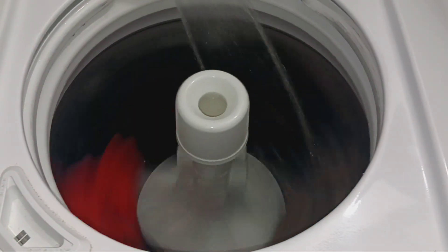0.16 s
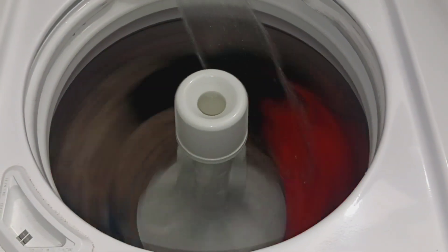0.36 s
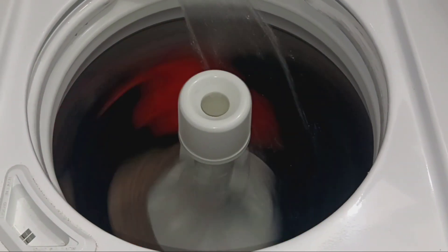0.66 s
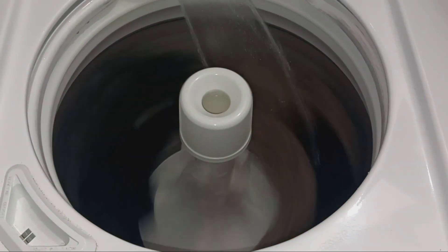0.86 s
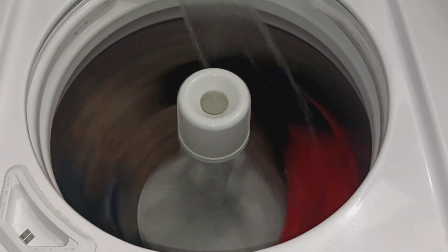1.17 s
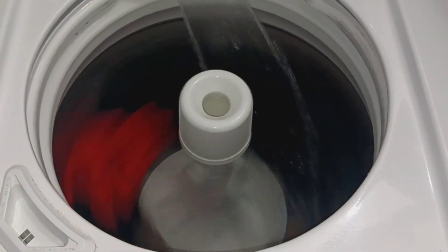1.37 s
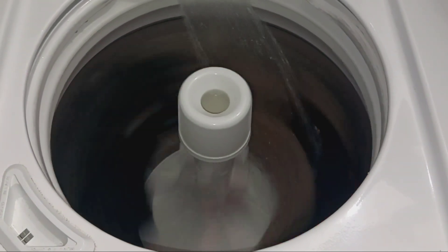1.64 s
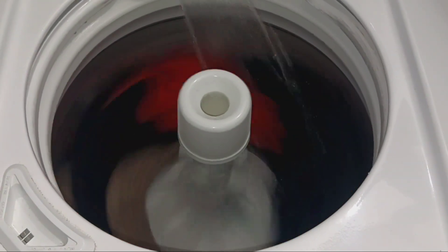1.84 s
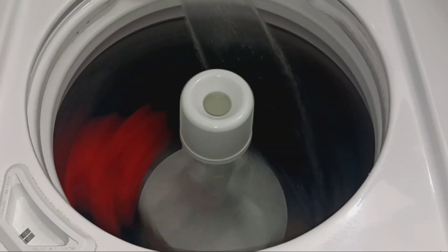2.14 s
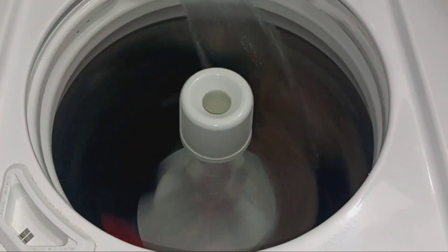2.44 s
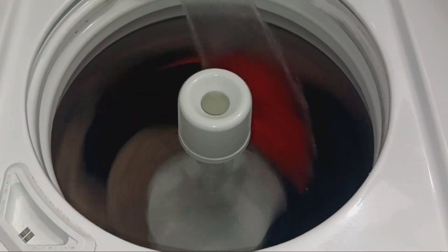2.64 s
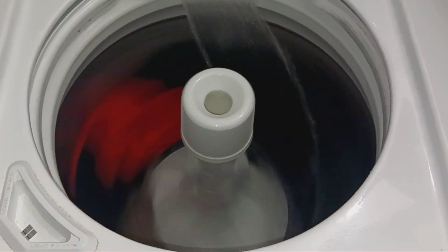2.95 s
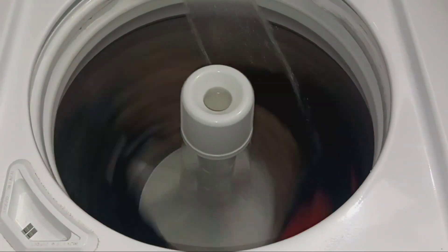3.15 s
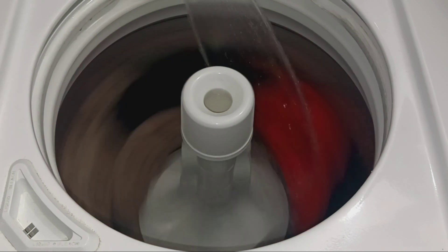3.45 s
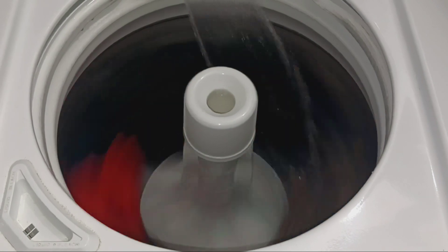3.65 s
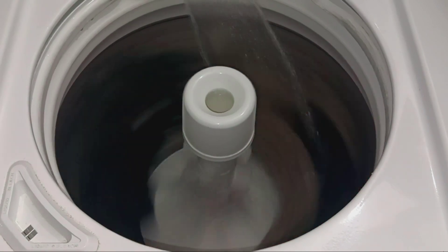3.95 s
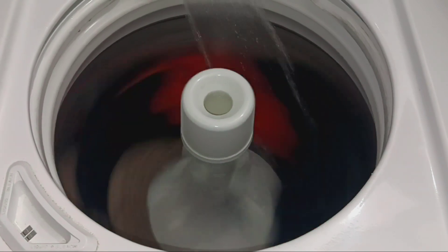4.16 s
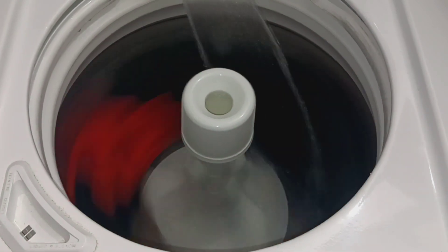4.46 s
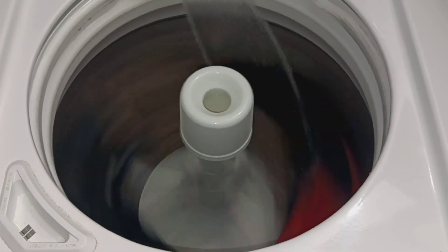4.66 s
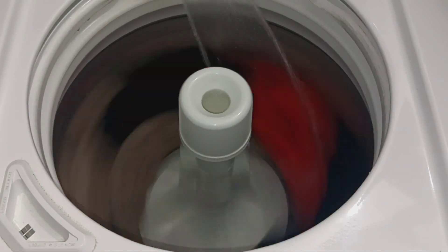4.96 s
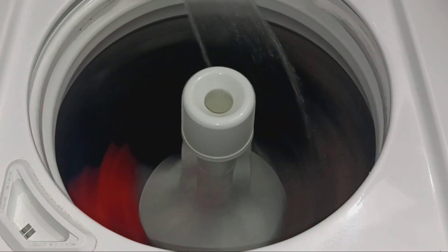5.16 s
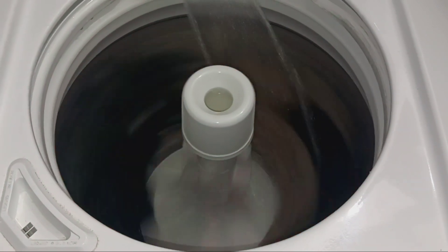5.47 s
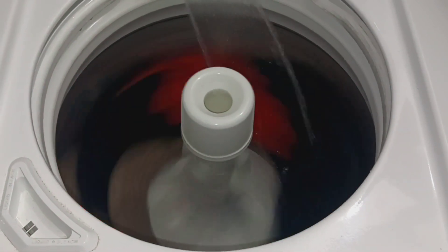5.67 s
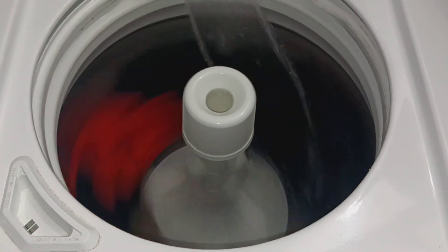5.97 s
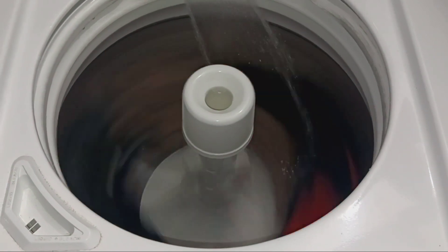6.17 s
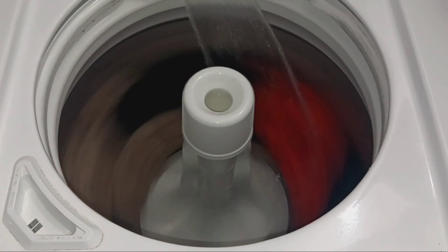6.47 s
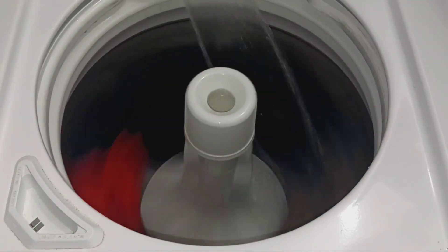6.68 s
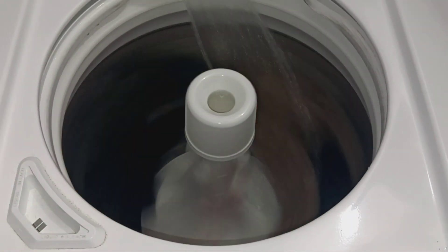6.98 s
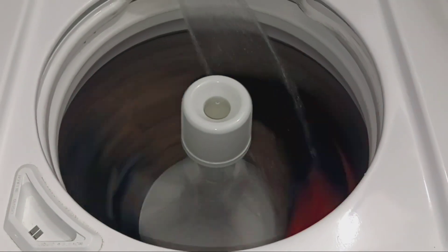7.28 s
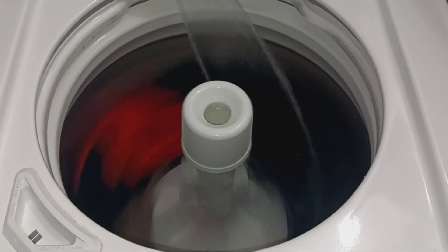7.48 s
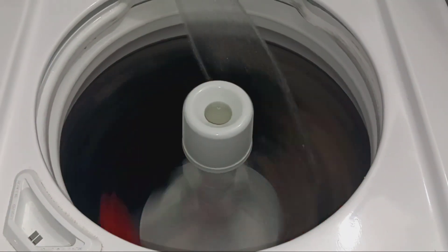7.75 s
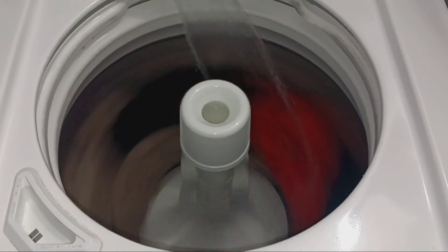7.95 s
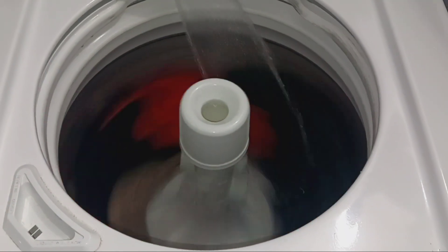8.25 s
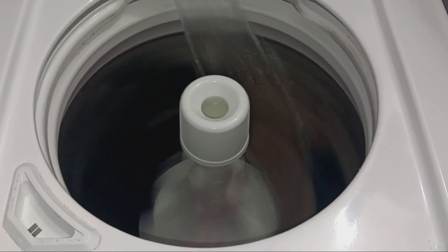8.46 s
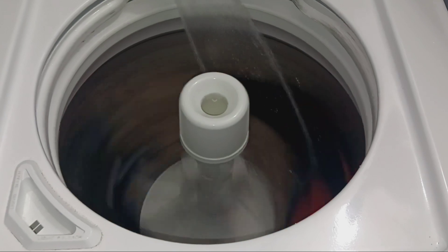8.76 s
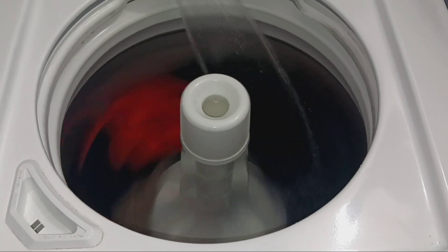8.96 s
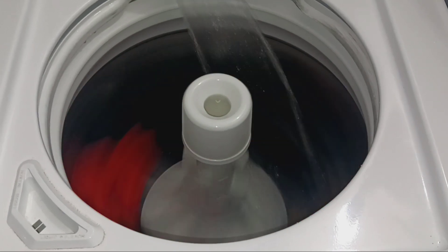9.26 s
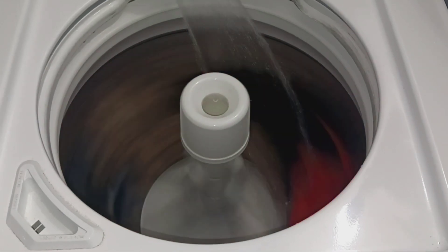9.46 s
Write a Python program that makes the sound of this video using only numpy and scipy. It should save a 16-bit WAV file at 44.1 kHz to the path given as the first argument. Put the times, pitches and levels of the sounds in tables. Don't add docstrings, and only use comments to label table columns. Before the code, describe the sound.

Inside an open top-loading washer, a deep motor hum and cabinet rumble run without pause, throbbing about two and a half times a second. A fine spray hisses over passing laundry with short irregular spatters, tiny ticks and faint hollow water slaps. The throb quickens slightly. Close handheld phone in a laundry room; left side dull and boomy, right side brighter.

```python
import sys
import numpy as np
from scipy import signal
from scipy.fft import rfft, irfft, next_fast_len
from scipy.io import wavfile
from scipy.ndimage import uniform_filter1d

SR = 44100
rng = np.random.default_rng(int(sys.argv[2]) if len(sys.argv) > 2 else 0)


def gain_from_db(level_db):
    decades = np.asarray(level_db, float) / 20
    return 10 ** decades


def waveform_to_disk(signal):
    frames = np.transpose(np.atleast_2d(signal))
    scaled = np.clip(frames, -1, 1) * 32767
    samples = np.round(scaled).astype(np.int16)
    wavfile.write(sys.argv[1], SR, samples)


N = 424241

# (time [s], rate [swings/s])
BASKET = [
    (0, 2.481),
    (2.4, 2.581),
    (4.8, 2.643),
    (7.2, 2.692),
    (9.62, 2.781),
]
# (time [s], phone gain [dB], cabinet boom [dB])
DRIFT = [(0, 2.5, -2), (.25, 1.5, -3.5), (.6, 2.5, -3.5), (.95, 0.5, -0.5), (1.3, -0.34, .2), (2.2, 0, 0),
         (3.2, 0.24, 0), (4.9, 0.16, 0), (5.4, 0, 0.5), (5.68, -2, 0.3), (5.85, -.4, 0.7), (6.05, -.4, -.6),
         (6.3, 0, 0), (8, -0.24, 0), (9.62, -0.4, 0.6)]
# (time [s], peak [dB], ring [Hz])
GURGLES = [(0.066, -33, 694), (0.311, -33, 705), (0.517, -31, 711), (0.645, -31, 719), (0.917, -22, 711),
           (1.119, -38, 743), (1.837, -30, 724), (2.049, -33, 762), (2.3, -27, 720), (2.603, -31, 770),
           (2.823, -29, 719), (3.377, -27, 719), (3.88, -31, 721), (4.055, -31, 719), (4.729, -26, 720),
           (5.236, -28, 780), (5.758, -32, 762), (5.931, -29, 705), (6.279, -28, 708), (6.7, -30, 705),
           (7.621, -31, 799), (7.922, -31, 721), (8.397, -31, 781), (8.801, -36, 778)]
# (time [s], peak [dB], centre [Hz], width [octaves])
SPLASHES = [(0.1027, -15, 10000, .9), (0.134, -10.5, 7000, 1.1), (0.4988, -26, 9330, .6),
            (1.0839, -25, 6860, .6), (1.3154, -17, 5560, .12), (1.4653, -12.5, 6210, .3),
            (1.4984, -11, 3900, 1.1), (1.8008, -18, 10500, 1.1), (2.1929, -18, 4200, .3),
            (2.2418, -18, 6400, .4), (2.639, -14, 5900, .6), (3.2779, -13, 9800, .6),
            (3.69, -11.5, 5460, 0.85), (3.8686, -13, 10000, .6), (4.1929, -18, 6610, .6),
            (4.3904, -17, 6100, .6), (5.3278, -14, 9880, .6), (5.7064, -18, 6830, .6),
            (6.1804, -17, 6690, .6), (6.6144, -20, 6090, .6), (6.7755, -19, 5210, .6),
            (6.9915, -21, 7100, .6), (7.455, -9, 4040, .7), (7.5727, -18, 6910, .4),
            (7.9349, -17, 5740, .35), (8.2242, -12, 12800, .45), (8.525, -9, 9000, .8),
            (8.6462, -20, 6380, .3), (9.1597, -11.5, 5150, 0.81), (9.3906, -14, 9600, .6)]


def evened(x):
    return x / np.sqrt(np.mean(x ** 2) + 1e-20)


def read(points, hz, below_db=0, above_db=0):
    f, value = np.transpose(points)
    octave = np.log2(np.maximum(hz, 1))
    low_slope = below_db * np.maximum(np.log2(f[0]) - octave, 0)
    high_slope = above_db * np.maximum(octave - np.log2(f[-1]), 0)
    return np.interp(octave, np.log2(f), value) + low_slope + high_slope


def curve(table, t, count):
    rows = np.array(table)
    return np.interp(t, rows[:, 0], rows[:, count])


def swings(t):
    return np.cumsum(curve(BASKET, t, count=1)) * t[1]


def throb(row, t):
    turns, speed = swings(t), curve(BASKET, t, count=1)
    wave = 0
    for k, (depth_db, start) in enumerate(np.reshape(row[1:], (-1, 2)), 1):
        wave = wave + depth_db * np.cos(2 * np.pi * (k * turns + start))
    return row[0] + wave * (speed / speed.mean()) ** 4.9


def wander(t, low_hz, high_hz):
    slow = np.arange(0, t[-1] + .02, .01)
    x = np.zeros(len(slow))
    for f in np.geomspace(low_hz, high_hz, 40):
        x += np.sin(2 * np.pi * (f * slow + rng.random())) / np.sqrt(f)
    return np.interp(t, slow, evened(x))


def tone(level_db, angle):
    return gain_from_db(level_db) * np.sqrt(2) * np.cos(angle)


def motor():
    # (left [dB], right [dB], start [turns], rocking depth [rad], rocking start [rad])
    harmonics = [
        (2.9, -3, 0, .18, .11),
        (4.2, -.8, .26, .33, -2.01),
        (5.9, 1, -.34, .06, -.64),
    ]
    # (mean [dB], then depth [dB], start [turns] for once, twice, thrice a swing)
    hum_throb = [(-8.6, 0.97, -0.061, 0.59, 0.065, 0.28, -.42), (-31.5, 2.74, 0.3, 1, 0.21, .1, -.24),
                 (-29, 1.8, 0.18, 0.42, -0.42, 0.16, -0.4)]
    # (hum multiple, shaft order, left [dB], right [dB])
    whine = [(0, 16, -31.5, -36.7), (0, 17, -45, -54), (0, 57, -39.5, -62), (1, 1, -42, -47),
             (3, -1, -39, -50), (3, 1, -35, -46)]
    # (rate [Hz], left [dB], right [dB])
    shake = (19.96, -35.5, -40.5)
    hum_hz, shaft_hz = 120.012, 19.372
    t, out = np.arange(N) / SR, np.zeros((2, N))
    turns = swings(t)
    for k, (left_db, right_db, start, depth, rock) in enumerate(harmonics, 1):
        angle = 2 * np.pi * (k * hum_hz * t + start) + depth * np.cos(2 * np.pi * turns + rock)
        level_db = throb(hum_throb[k - 1], t) + k * 0.35 * wander(t, 1.5, 8)
        if k == 1:
            level_db += curve(DRIFT, t, count=2)
        out += gain_from_db([[left_db], [right_db]]) * tone(level_db, angle)
    for hum, order, left_db, right_db in whine:
        hz = hum * hum_hz + order * shaft_hz
        drag = 0.016 * order * np.cos(np.pi * turns)
        flutter_db = 0.62 * wander(t, 1.5, 8)
        angle = 2 * np.pi * (hz * t + rng.random()) + drag
        out += gain_from_db([[left_db], [right_db]]) * tone(flutter_db, angle)
    hz, left_db, right_db = shake
    throb_db = 1.3 * np.cos(2 * np.pi * (turns + 0.87))
    return out + gain_from_db([[left_db], [right_db]]) * tone(throb_db, 2 * np.pi * hz * t)


def noise_pair(size, colour_db, patchy_db):
    # (frequency [Hz], likeness [0-1])
    likeness = [(40, .7), (100, .55), (200, .85), (430, .95), (560, .5), (780, .5), (1100, .3), (1500, .35),
                (3000, .15), (8000, .05)]
    # (frequency [Hz], lead [rad])
    lead = [(350, 0), (430, .55), (520, -.3), (750, .85), (1100, -.6), (1500, 0)]
    hop = size // 4
    frames, hz = N // hop + 5, np.fft.rfftfreq(size, 1 / SR)
    a, b, c, d, patches = rng.standard_normal((frames, len(hz), 5)).T
    patches = uniform_filter1d(patches, size=8, axis=0)
    patches = evened(uniform_filter1d(patches, size=12, axis=1))
    same = np.clip(read(likeness, hz), -1, 1)[:, None]
    left, other = a + 1j * b, c + 1j * d
    right = same * left * np.exp(1j * read(lead, hz))[:, None] + np.sqrt(1 - same ** 2) * other
    z = np.array([left, right])
    z *= gain_from_db(colour_db(hz, np.arange(frames) * hop / SR) + patchy_db * patches)
    return signal.istft(z, nperseg=size, noverlap=size - hop)[1][:, :N]


def bumps(rows, t, rise_s, fade_s):
    s, peak_db = np.transpose(rows)[:2, :, None]
    height = gain_from_db(.5 * (peak_db - peak_db.max()))
    return height * np.exp(np.minimum((t - s) / rise_s, (s - t) / fade_s))


def rumble():
    # (frequency [Hz], density [dB per Hz])
    rumble_left = [(35, -15), (60, -8.5), (100, -3.5), (160, 0), (280, 0), (430, -1), (540, -7), (860, -9),
                   (1100, -7.5), (1600, -6), (1850, -8.5), (2350, -9.5), (2900, -18)]
    rumble_right = [(35, -17), (60, -13.5), (100, -6), (160, -4), (280, -7), (430, -6), (620, -14),
                    (1000, -15), (1500, -12), (1800, -18), (2300, -17.5), (2900, -20)]
    # (centre [Hz], width [Hz], left [dB], right [dB])
    panels = [(51, 10, 5, 4), (158, 12, 4, 4), (204, 12, 3, 4), (222, 12, -5, -4), (265, 14, -5, -5),
              (428, 30, 10, 9), (600, 16, 6, 4), (720, 26, 10, 1), (772, 24, 8, 7), (948, 14, 6, 2),
              (1040, 40, 4, 3), (1238, 16, 5, 1), (1204, 14, 1, 6), (1272, 14, 3.5, 1), (1444, 14, 5, 4),
              (1535, 60, 5, 2), (1713, 30, 6, 1), (2175, 60, 4.5, 4)]
    # (mean [dB], then depth [dB], start [turns] for once, twice, thrice a swing)
    slosh_throb = (-34.5, .65, -0.57, 0.49, -0.6, 0.27, 5)
    wall_throb = (-0.48, 0.77, .37, 0.036, .06, -0.069, -.3)

    def colour_db(hz, t):
        db = np.array([read(p, hz, below_db=-3, above_db=-16) for p in (rumble_left, rumble_right)])
        for centre_hz, width, left_db, right_db in panels:
            db += np.outer([left_db, right_db], 1 / (1 + (2 * (hz - centre_hz) / width) ** 2))
        wall = np.exp(-((hz - 740) / 110) ** 2)[:, None]
        slaps_db = 2.5 * bumps(GURGLES, t - .03, rise_s=0.039, fade_s=0.056).sum(0)
        gurgle_db = throb(wall_throb, t) + slaps_db - slaps_db.mean() + 1.5 * wander(t, 3, 15)
        return db[:, :, None] + wall * gurgle_db

    t = np.arange(N) / SR
    level_db = throb(slosh_throb, t) + 0.5 * wander(t, 2.5, 18)
    return gain_from_db(level_db + 9.2) * evened(noise_pair(size=4096, colour_db=colour_db, patchy_db=1.1))


def bloops():
    rise_s, fade_s = .015, 0.03
    out, t = np.zeros(N + SR), np.arange(SR // 5) / SR
    shape = np.minimum(t / rise_s, 1) * np.exp(-np.maximum(t - rise_s, 0) / fade_s)
    for s, peak_db, hz in GURGLES:
        out[round(s * SR):][:len(t)] += gain_from_db(peak_db + 1.3) * shape * np.sin(2 * np.pi * hz * t)
    return gain_from_db([[2.5], [-4.5]]) * out[:N]


def ports(x):
    # (frequency [Hz], density [dB per Hz])
    spray_left = [(2900, -21), (4200, -17), (5200, -20), (7000, -16), (8300, -23.5), (10500, -35)]
    spray_right = [(2200, -25), (3600, -20.5), (4200, -15.5), (6500, -12.5), (7800, -15.3), (9200, -11.3),
                   (11000, -15), (12800, -18.5), (15600, -20)]
    size = next_fast_len(N)
    hz = np.fft.rfftfreq(size, 1 / SR)
    gain = gain_from_db([read(p, hz, below_db=-14) + 14 for p in (spray_left, spray_right)])
    return irfft(rfft(x, size) * gain, size)[:, :N]


def spurts(t, per_s, fade_s):
    step = t[1]
    kicks = np.minimum(rng.exponential(1, len(t)), 2.5) * (rng.random(len(t)) < per_s * step)
    x = signal.lfilter([1], [1, -np.exp(-step / fade_s)], kicks)
    return evened(x - x.mean())


def surges(hz, t):
    octaves_off = np.log2((hz[:, None] + 1) / np.transpose(SPLASHES)[2])
    near = np.exp(-(octaves_off / 0.9) ** 2)
    return 3 * near @ bumps(SPLASHES, t, rise_s=0.0028, fade_s=0.028)


def droplets():
    drops, t = np.zeros((2, N)), np.arange(400) / SR
    for hz in np.geomspace(4000, 15000, 24):
        size = gain_from_db(4.0 * np.minimum(rng.exponential(1, N), 3)) * (rng.random(N) < 30 / SR)
        fade = np.exp(-t * hz / 6.9) * np.minimum(t * hz / 1.2, 1)
        plink = np.sin(2 * np.pi * hz * t * (1 + 9 * t)) * fade
        sides = rng.uniform(0.41, 1, 2) * hz / 8000
        drops += np.outer(sides, signal.oaconvolve(size, plink)[:N])
    return drops


def spray():
    # (mean [dB], then depth [dB], start [turns] for once, twice, thrice a swing)
    sheet_throb = (-33.5, 0.85, 0.44, 0.65, 0.3, 0.48, 0.1)
    top_throb = (0.033, .1, 0.12, 0.012, .3, .15, 0.2)

    def colour_db(hz, t):
        top = np.clip((hz - 8000) / 4000, 0, 1)[:, None]
        wide, fine = spurts(t, per_s=40, fade_s=0.0065), spurts(t, per_s=22, fade_s=0.003)
        level_db = throb(sheet_throb, t) + surges(hz, t) + 0.52 * wander(t, 3, 14)
        gap_db = -1.5 * np.exp(14 * (np.cos(2 * np.pi * (swings(t) - .13)) - 1))
        top_db = throb(top_throb, t) + gap_db - gap_db.mean() + 1.1 * fine
        return top * top_db + 0.99 * wide + level_db - level_db.mean()

    hiss = evened(noise_pair(size=256, colour_db=colour_db, patchy_db=1.43))
    water = hiss + gain_from_db(-22) * evened(droplets())
    return gain_from_db(sheet_throb[0] + 6.5) * evened(ports(water))


def thread_snaps():
    kicks = gain_from_db(2.7 * np.minimum(rng.exponential(1, N), 3)) * (rng.random(N) < 12 / SR)
    fade_s = 0.0014
    snaps = signal.lfilter([1], [1, -np.exp(-1 / (fade_s * SR))], kicks) * rng.standard_normal((2, N))
    high = signal.butter(3, 11000, "high", fs=SR, output="sos")
    return gain_from_db(-17.5) * signal.sosfilt(high, snaps)


def splashes():
    out, t = np.zeros((2, N)), np.arange(3000) / SR
    shape = np.minimum(t / 0.0017, 1) * (np.exp(-t / 0.0051) + 0.22 * np.exp(-t / .026))
    for s, peak_db, hz, octaves in SPLASHES:
        half = 2 ** (octaves / 2)
        band = signal.butter(3, [hz / half, min(hz * half, 19000)], "band", fs=SR, output="sos")
        burst = evened(signal.sosfilt(band, rng.standard_normal((2, len(t)))))
        part = out[:, round(s * SR):][:, :len(t)]
        part += (gain_from_db(peak_db - 6.0) * burst * shape)[:, :part.shape[1]]
    return ports(out + thread_snaps())


def scene():
    return motor() + rumble() + bloops() + spray() + splashes()


def below(x, hz):
    return signal.oaconvolve(x, signal.firwin(1023, hz, window=("kaiser", 7), fs=SR), "same")


def band_limit(x):
    return signal.sosfilt(signal.butter(12, 15880, fs=SR, output="sos"), x)


def record(dry):
    gained = dry * gain_from_db(curve(DRIFT, np.arange(N) / SR, count=1))
    left = np.roll(below(gained[0], 10700), 39)
    right = below(gained[1], 15720)
    both = np.array([left, right])
    over = np.maximum(abs(both) - .85, 0)
    limited = both - np.sign(both) * (over - .17 * np.tanh(over / .17))
    return band_limit(np.clip(limited, -1, 1))


dry = scene()
out = record(dry)
waveform_to_disk(out)
```